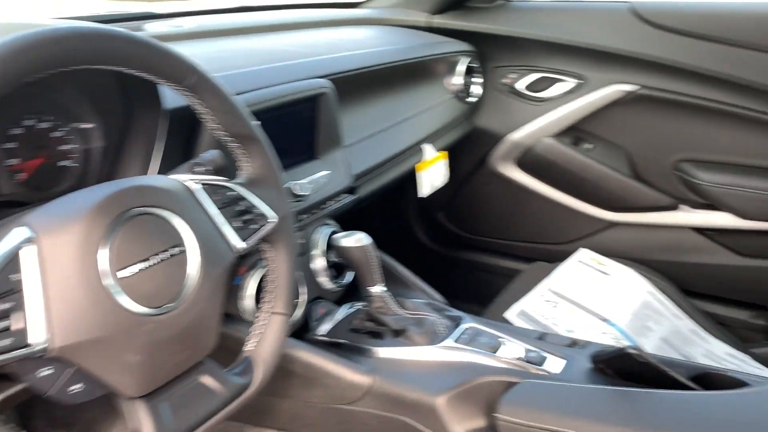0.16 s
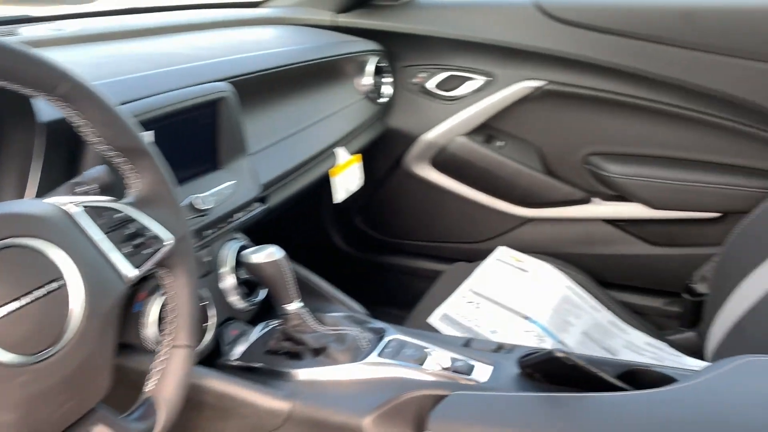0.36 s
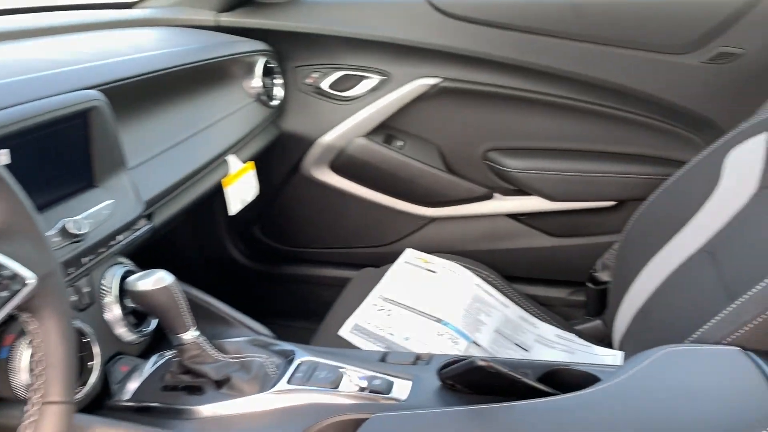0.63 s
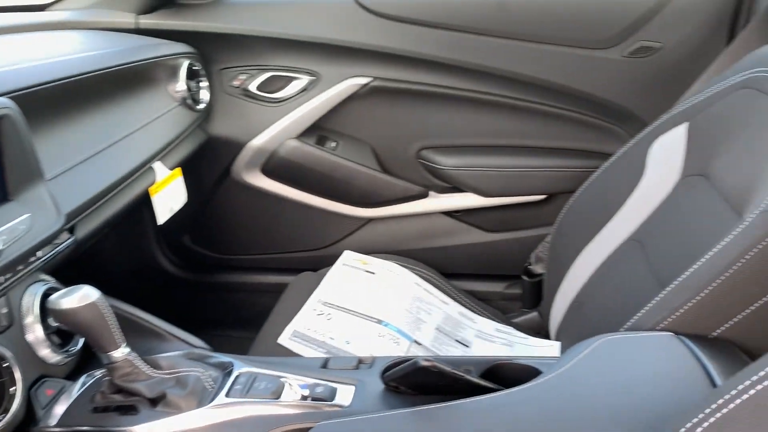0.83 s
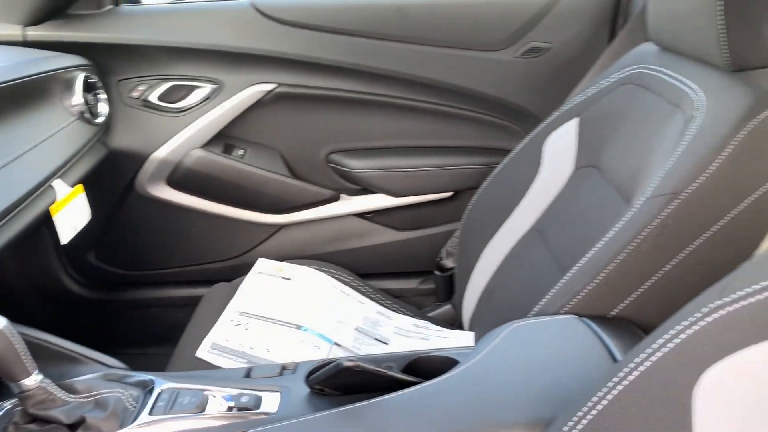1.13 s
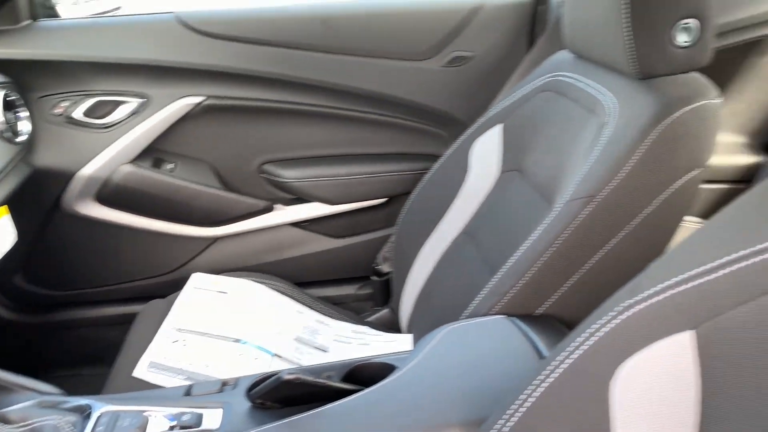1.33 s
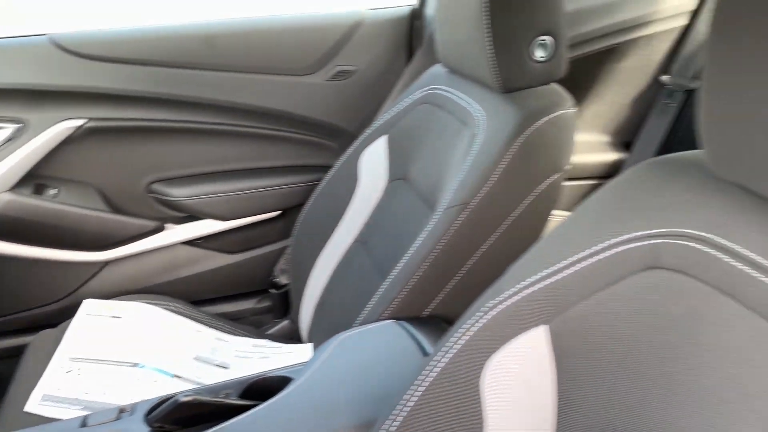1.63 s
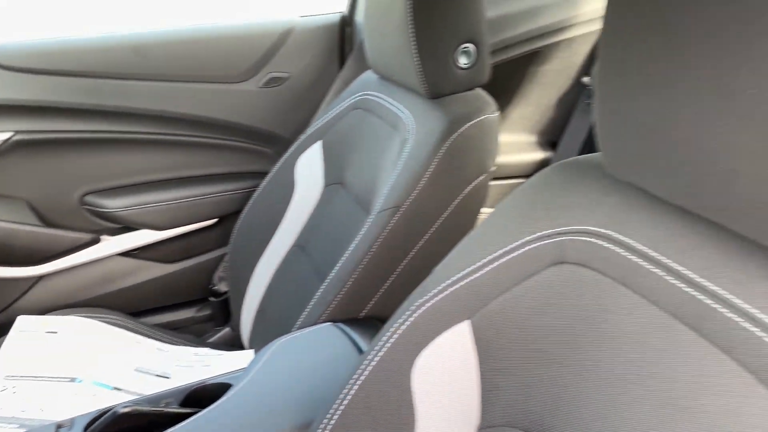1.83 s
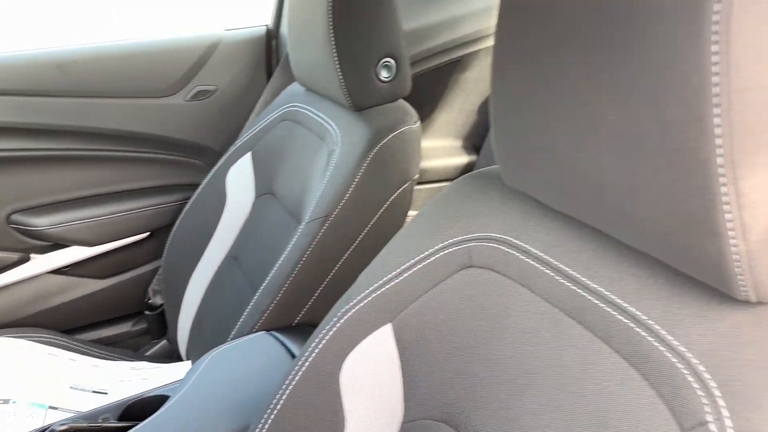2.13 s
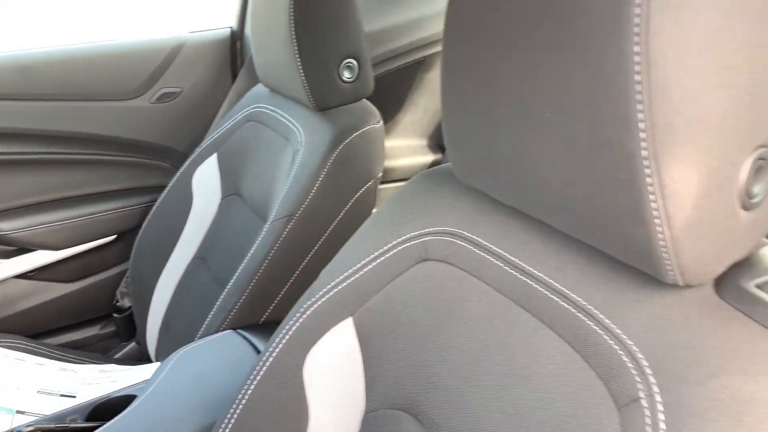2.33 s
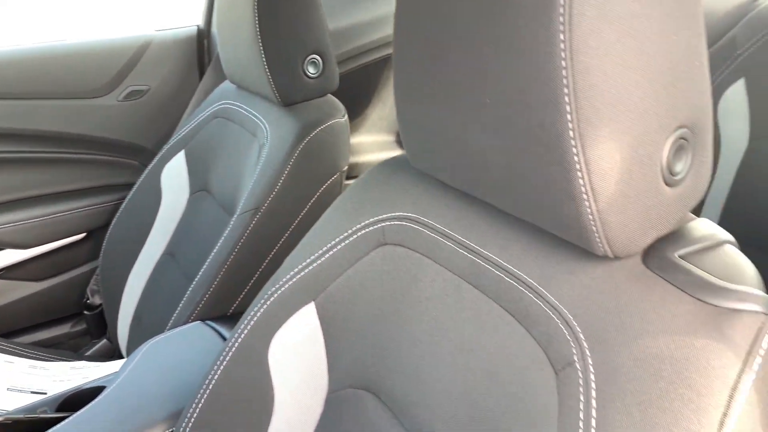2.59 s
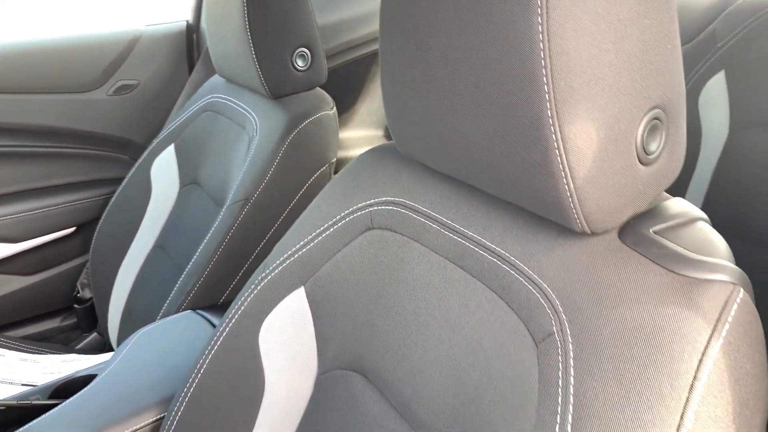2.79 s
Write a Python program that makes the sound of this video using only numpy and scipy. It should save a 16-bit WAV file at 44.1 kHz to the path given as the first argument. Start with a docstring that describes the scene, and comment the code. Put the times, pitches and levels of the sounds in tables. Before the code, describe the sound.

A car engine idles with a deep throb and a steady hum, heard close by through the open door. Light wind and a few soft bumps touch the microphone early on, and the interior trim clicks faintly now and then.

```python
"""A V8 engine idles, heard through the open door by a hand-held phone that pans across the cabin.
Its exhaust pulses make a deep throb, and each cylinder rings the body panels in its own way.
A pump hums, light air buffets the microphones, the phone takes a few soft thumps and trim clicks
now and then. Behind it all is the rush of engine, fans and yard; a thin hiss comes up near the end."""
import sys
import numpy as np
from scipy import signal
from scipy.fft import rfft, irfft, next_fast_len
from scipy.io import wavfile
from scipy.ndimage import uniform_filter1d

SR = 44100
rng = np.random.default_rng(int(sys.argv[2]) if len(sys.argv) > 2 else 0)


def generate_wav(signal):
    """Clip the signal to [-1, 1] and save it as 16-bit WAV at the path in sys.argv[1]."""
    frames = np.transpose(np.atleast_2d(signal))
    scaled = np.clip(frames, -1, 1) * 32767
    pcm = np.round(scaled).astype(np.int16)
    wavfile.write(sys.argv[1], SR, pcm)


N = 130095
TIME = np.arange(N) / SR
SIDES = np.array([[.5], [-.5]])  # splits a difference between left and right

# Engine speed. Each row: time in seconds, firings per second.
FIRING_RATE = [(0, 37.55), (.5, 37.55), (.65, 38.3), (1.0, 38.16), (1.9, 38.16), (2.1, 37.9), (2.95, 37.88)]


def engine():
    """The cylinders fire at a slightly wandering pace, driving the exhaust and the panels."""
    firings = np.cumsum(curve(FIRING_RATE)) / SR - .22 + .012 * walk(6.14)  # a running count
    return exhaust(firings) + panels(firings)


# The throb's tones. Each row: multiple of the firing rate, relative level in dB, waver in dB,
# left side's lead in radians.
EXHAUST_TONES = [(1, 0, 1.2, -0.4), (2, -7.5, 1.53, -0.45)]
# How loud the throb is. Each row: time in seconds, level in dB.
THROB_LEVEL = [(0.0, -27), (0.43, -25), (2.95, -27.5)]
# Lift of the upper tone as the phone turns. Each row: time in seconds, boost in dB.
UPPER_LIFT = [(0, 5.5), (.5, 0.5), (1.0, -3.5), (1.9, 0), (2.2, 2)]


def exhaust(firings):
    """Exhaust pulses make a suction-shaped throb: the pressure dips at each firing."""
    throb = 0
    for multiple, db, waver_db, lead in EXHAUST_TONES:
        gain = undb(db + (multiple - 1) * curve(UPPER_LIFT) + waver_db * walk(7.42))
        throb = throb - gain * np.cos(2 * np.pi * multiple * firings + SIDES * lead)
    fade_in = np.minimum(TIME / .01, 1)
    return np.sqrt(2) * throb * undb(curve(THROB_LEVEL)) * fade_in * pan(-3.5)


# The panels' notes. Each row: pitch in Hz, width in Hz, level in dB, random scatter in dB,
# left side's lead in radians.
PANEL_NOTES = [(261, 26, -45, 3, -0.19), (298.1, 15, -42.5, 2.5, 0.61), (324.8, 19.3, -41, 0.85, 0.95),
               (352.3, 13.2, -46.5, 2, 1)]
# How hard one panel is hit. Each row: strength in dB for each of the eight cylinders.
CYLINDER_HITS = [(-3, -1, -4, -6, -5, -1, 0, -3), (-3, -1, 0, -2, -1, -2, -2, -3),
                 (-13, -11, -13, -13, -8, 0, -8, -13), (-2, -1, -1, -4, -3, 0, -2, -3)]
# The panels swell as the phone turns. Each row: time in seconds, boost in dB.
PANEL_SWELL = [(0, -0.5), (.55, -4), (.8, -2.5), (1.8, 1), (2.95, -0.4)]


def panels(firings, jitter_s=.00029):
    """Each firing knocks the body panels a little unevenly, and they ring."""
    fired = np.flatnonzero(np.diff(np.floor(firings)) > 0)
    out = 0
    for (hz, width_hz, db, scatter_db, lead), hits_db in zip(PANEL_NOTES, CYLINDER_HITS):
        timing, strength = rng.standard_normal((len(fired), 2)).T
        at = np.clip(fired + (timing * jitter_s * SR).astype(int), 0, N - 1)
        knocks = np.zeros(N)
        knocks[at] = undb(np.resize(hits_db, len(fired)) + scatter_db * strength)
        ring = unit(band(band(knocks, hz, width_hz), hz, 1.39 * width_hz))
        ring = signal.hilbert(ring, next_fast_len(N))[:N]  # lets each side's phase be shifted
        out = out + undb(db) * np.real(ring * np.exp(1j * SIDES * lead))
    return out * pan(-3.5) * undb(curve(PANEL_SWELL))


# How loud the pump is. Each row: time in seconds, left level in dB, right level in dB.
PUMP_LEVEL = [(0, -38.5, -38.5), (.35, -41, -43), (.5, -50.5, -62), (.9, -54, -58), (1.25, -40.5, -40.5),
              (1.7, -39, -32), (2.3, -37, -34), (2.95, -36.5, -35.5)]


def pump(hz=383.36, lead_radians=1.5):
    """A pump hums one note, whose level at each microphone moves as the phone turns."""
    tone = np.sqrt(2) * np.cos(2 * np.pi * hz * TIME + SIDES * lead_radians)
    level_db = np.array([curve(PUMP_LEVEL), curve(PUMP_LEVEL, col=2)])
    return tone * undb(level_db + .35 * walk(2))


# Air on the microphones. Each row: time in seconds, level in dB.
AIR_LEVEL = [(0, -42), (.2, -36), (.4, -30), (.65, -32), (.85, -38.5), (1.3, -44), (1.6, -57), (2.95, -46)]


def air_buffet(hz=69.7, width_hz=47, gust_db=7):
    """Gusts of air make a low rumble, partly different at each microphone."""
    shared, left, right = (undb(gust_db * walk(14)) * band(rng.standard_normal(N), hz, width_hz)
                           for _ in range(3))
    gusts = shared + .53 * np.array([left, right])
    rumble = signal.sosfilt(signal.butter(2, 190, fs=SR, output="sos"), gusts)
    return unit(rumble) * undb(curve(AIR_LEVEL))


# Bumps on the phone. Each row: start in seconds, level in dB, pitch in Hz, seconds to fade by 60 dB.
THUMPS = [(0.44, -27.5, 189, 0.04), (0.448, -19.5, 66, 0.12), (.508, -21, 181, 0.058),
          (0.576, -23.5, 345, 0.0068), (0.63, -30, 153, 0.032)]


def thumps():
    """Each soft bump on the phone is a low tone that dies away fast."""
    out, t = np.zeros((2, N)), np.arange(SR // 10) / SR
    for start, db, hz, fade_s in THUMPS:
        shape = (1 - np.exp(-12 * t / fade_s)) * undb(-60 * t / fade_s)
        thump = shape / shape.max() * np.sin(2 * np.pi * hz * t)
        at = int(start * SR)
        out[:, at:at + len(t)] += undb(db) * pan(-1.6) * thump
    return out


# Clicks of the trim. Each row: start in seconds, level in dB, pitch in Hz, blip length in seconds,
# crackle in dB relative to the click.
TRIM_CLICKS = [(.1143, -34, 1020, .008, -24), (.116, -49, 4750, .007, -20), (.1205, -37, 1430, .008, -19),
               (.1145, -43, 3000, .009, -24), (.124, -37, 850, .009, -16), (.1295, -39, 1430, .008, -9),
               (.127, -40, 2960, .011, -20), (.1375, -38, 900, .005, -17), (.149, -49, 2300, .008, -6),
               (.5655, -43, 1500, .005, -10), (.571, -47, 1900, .010, -5), (.9755, -31, 1550, .0035, -30),
               (.978, -35, 2700, .005, -26), (.984, -32, 1450, .005, -15), (.993, -43, 1550, .005, -9),
               (1.0045, -43, 1350, .004, -10), (1.015, -45, 1600, .004, -16),
               (1.0225, -40, 1400, .011, -19), (1.9826, -41, 2000, .003, -8),
               (2.0225, -33, 1900, .0033, -15), (2.0461, -50, 2000, .003, -2),
               (2.0614, -41, 1800, .004, -10), (2.074, -45, 1800, .004, -14), (2.0855, -43, 1900, .004, -7),
               (2.096, -50, 1900, .004, -4)]


def trim_clicks(crackle_hz=7800, cabin_db=-7, cabin_fade_s=.09):
    """The trim gives short, rough blips with bright crackle; the cabin adds a noisy tail."""
    out, t = np.zeros((2, N)), np.arange(SR // 10) / SR
    tail = (1 - np.exp(-t / .0025)) * undb(cabin_db - 60 * t / cabin_fade_s)
    for start, db, hz, length_s, crackle_db in TRIM_CLICKS:
        white = rng.standard_normal((4, len(t)))
        tones = [(hz, 1)]
        if hz < 2500:  # lower clicks get an overtone
            tones.append((1.87 * hz, undb(-9.5)))
        rough = sum(gain * unit(band(band(white[:2], f, .42 * f), f, .42 * f)) for f, gain in tones)
        clean = sum(gain * np.sin(2 * np.pi * f * t + SIDES) for f, gain in tones)
        bright = unit(band(band(white[2:], crackle_hz, crackle_hz), crackle_hz, crackle_hz))
        blip = np.sin(np.pi * np.minimum(t / length_s, 1) ** .75)
        click = blip * clean + (blip / 2 + tail) * (rough + undb(crackle_db) * bright)
        at = int(start * SR)
        out[:, at:at + len(t)] += undb(db) * click
    return out


# The rush from bass to treble. Each row: pitch in Hz, relative level in dB.
RUSH_COLOUR = [(30, -11), (48, -9.5), (60, -4), (90, -8.5), (105, -19), (128, -8), (146, -17.5), (200, -15),
               (240, -20.5), (300, -26), (382, -23), (450, -22), (617, -23), (950, -26.5), (1220, -29.5),
               (1400, -31), (2220, -38.5), (2600, -37.5), (4500, -48.5), (7500, -56.5), (8400, -53),
               (11000, -67.5)]
# The rush swells as the phone turns. Each row: time in seconds, boost in dB (each pitch gets a share).
RUSH_SWELL = [(0, 0.5), (.45, -2), (1.0, -3.5), (1.3, -1), (1.75, 0), (2.2, 1.45), (2.95, 1.5)]


def rush():
    """Engine, fans and yard blend into one broad running noise."""
    return stereo_noise(RUSH_COLOUR, flicker_db=.45, swell_db=curve(RUSH_SWELL)) * undb(-35.5)


# How loud the hiss is. Each row: time in seconds, level in dB.
HISS_LEVEL = [(0, -68.5), (.6, -64.5), (1.0, -83), (2.15, -68), (2.3, -56.5), (2.45, -54), (2.95, -52.5)]
# The tone of the hiss. Each row: pitch in Hz, relative level in dB.
HISS_COLOUR = [(2500, -0.5), (5600, -7.5), (7300, -9), (8000, -4), (10500, -3), (11300, -11.5),
               (12600, -3.5), (13400, -12.5), (14200, -22)]


def hiss():
    """A thin, flickering hiss comes up towards the end."""
    return stereo_noise(HISS_COLOUR, flicker_db=1.1, swell_db=0) * undb(curve(HISS_LEVEL))


# How the two microphones hear noise. Each row: pitch in Hz, likeness from 0 to 1,
# left side's lead in radians, left minus right in dB.
MIC_PAIR = [(49.7, 1, 0.7, 3), (157, 0.85, -0.3, -4.5), (309, 1, -3, -2), (494, 0.49, 1.13, 1.1),
            (1150, 0.68, 2, 0.8), (1900, 0.07, 3, 0.5), (2750, 0, 0.9, 0.2), (6600, 0.3, 1.4, 1.2),
            (8550, 0.23, 2.2, -6.5), (10100, 0.9, 1.33, -2.5), (13000, 0.5, 1.5, .1)]
# How much of a swell each pitch gets. Each row: pitch in Hz, share from 0 to 1.
SWELL_SHARE = [(120, 0.065), (400, 0.59), (900, 0.82), (2500, 0.24), (8000, 0.27)]


def stereo_noise(colour, flicker_db, swell_db):
    """Background noise whose half-octave bands swell together and flicker on their own."""
    log_hz = np.log(np.maximum(np.fft.rfftfreq(N, 1 / SR), 1))

    def by_pitch(table, col=1, at=log_hz):
        rows = np.array(table)
        return np.interp(at, np.log(rows[:, 0]), rows[:, col])

    likeness = by_pitch(MIC_PAIR)
    white = rfft(rng.standard_normal((3, N)))
    shared = white[0] * np.exp(1j * SIDES * by_pitch(MIC_PAIR, col=2))
    spectrum = np.sqrt(likeness) * shared + np.sqrt(1 - likeness) * white[1:]
    spectrum *= undb(by_pitch(colour) + SIDES * by_pitch(MIC_PAIR, col=3))
    out, step = 0, np.log(2) / 2
    for centre in np.arange(np.log(30), np.log(20000), step):
        window = np.clip(1 - abs(log_hz - centre) / step, 0, 1)
        gain = undb(flicker_db * walk(9.45) + by_pitch(SWELL_SHARE, at=centre) * swell_db)
        out = out + gain * irfft(spectrum * window, N)
    return unit(out)


def undb(db):
    """Turn decibels into a number to multiply by."""
    return 10 ** (np.asarray(db) / 20)


def curve(table, col=1):
    """Join a table's points with straight lines in time."""
    rows = np.array(table, float)
    return np.interp(TIME, rows[:, 0], rows[:, col])


def unit(x):
    """Scale a sound to an average (rms) level of 1."""
    return x / np.sqrt(np.mean(x ** 2))


def band(x, hz, width_hz):
    """Keep the sound near one pitch, like a ringing object."""
    return signal.lfilter(*signal.iirpeak(hz, hz / width_hz, fs=SR), x)


def walk(rate):
    """A smooth random wobble of size about 1, with `rate` new values a second."""
    hold = int(SR / rate)
    steps = np.repeat(rng.standard_normal(N // hold + 1), hold)
    return 1.47 * uniform_filter1d(uniform_filter1d(steps, hold), hold)[:N]


def pan(db):
    """Left and right gains, `db` apart; below zero favours the right."""
    return undb(SIDES * db)


def scene():
    """Add up all the sources at the two microphones."""
    background = rush() + hiss()
    return engine() + pump() + air_buffet() + thumps() + trim_clicks() + background


def record(dry, low_hz=27, top_hz=13900, notch_hz=11810, notch_width_hz=490):
    """The phone cuts the deepest bass and the top; its microphone holes notch the treble."""
    dry = signal.sosfiltfilt(signal.butter(4, low_hz, "high", fs=SR, output="sos"), dry)
    dry = signal.filtfilt(*signal.iirnotch(notch_hz, notch_hz / notch_width_hz, fs=SR), dry)
    return signal.sosfilt(signal.ellip(8, .2, 70, top_hz, fs=SR, output="sos"), dry)


dry = scene()
out = record(dry)
generate_wav(out)
```